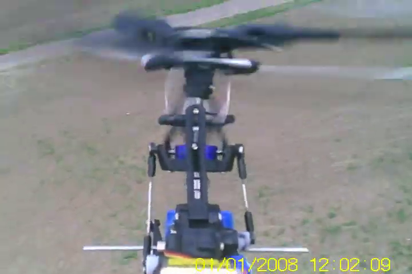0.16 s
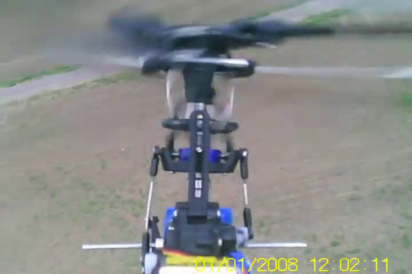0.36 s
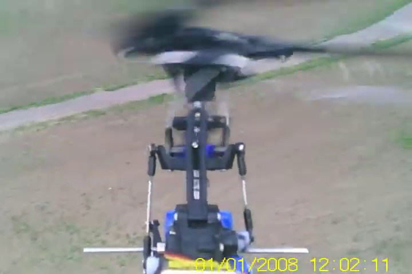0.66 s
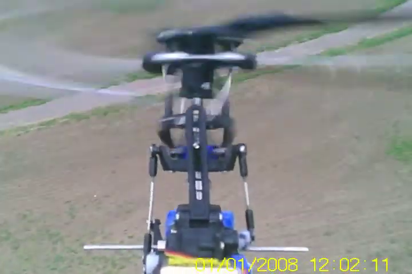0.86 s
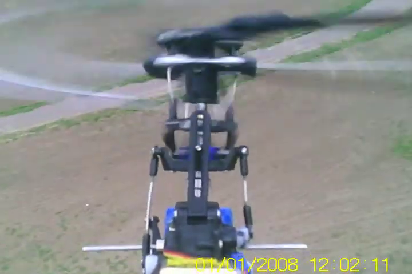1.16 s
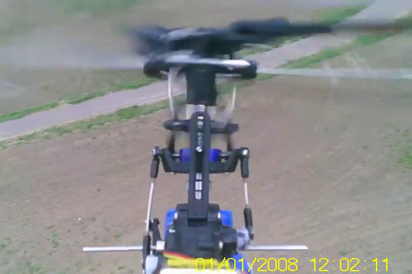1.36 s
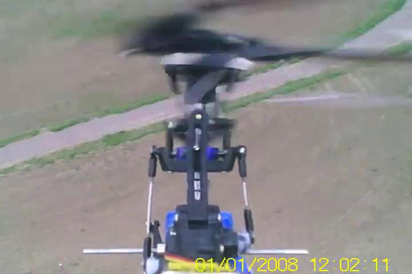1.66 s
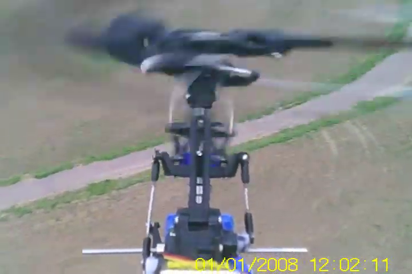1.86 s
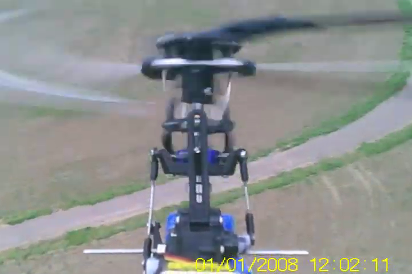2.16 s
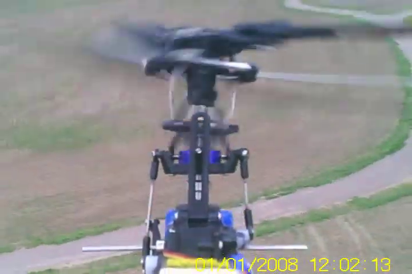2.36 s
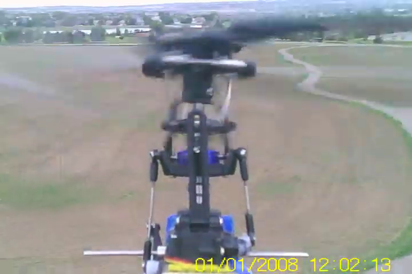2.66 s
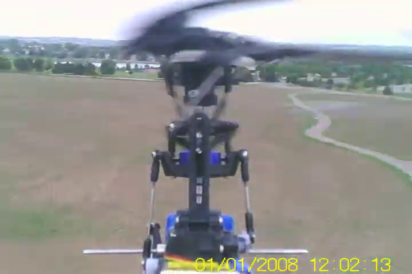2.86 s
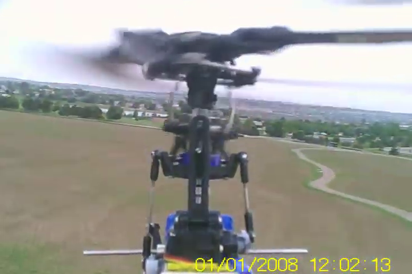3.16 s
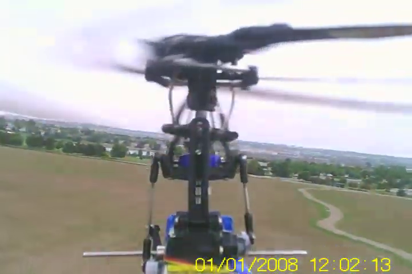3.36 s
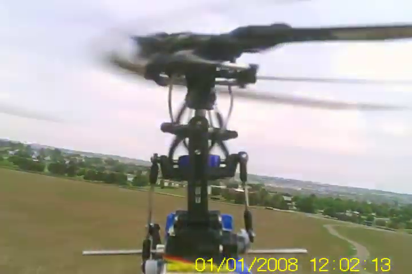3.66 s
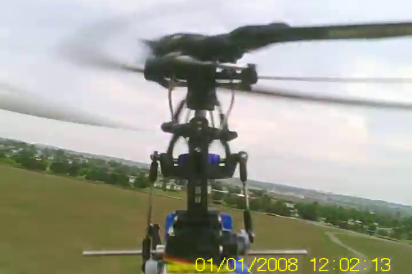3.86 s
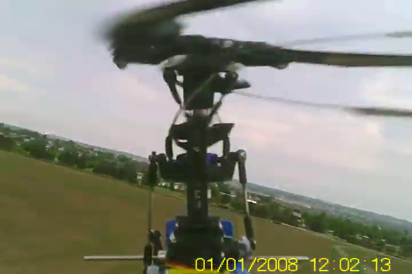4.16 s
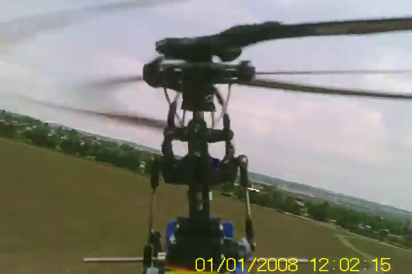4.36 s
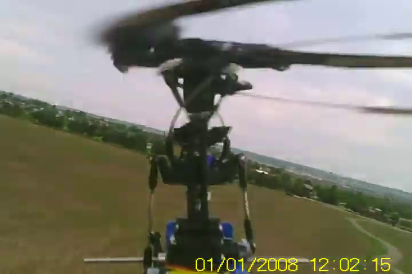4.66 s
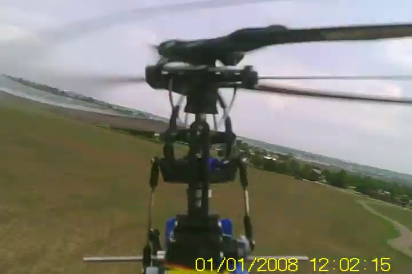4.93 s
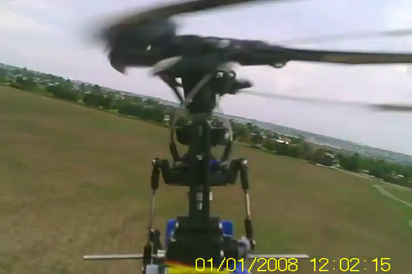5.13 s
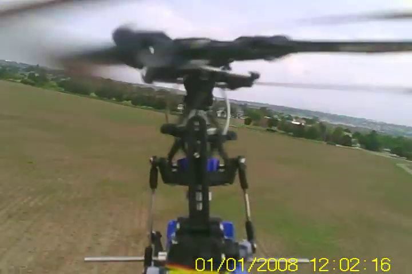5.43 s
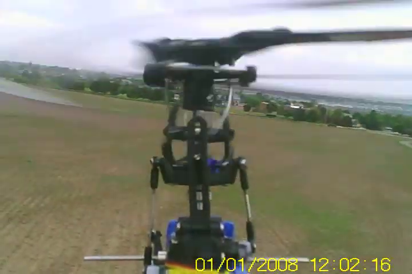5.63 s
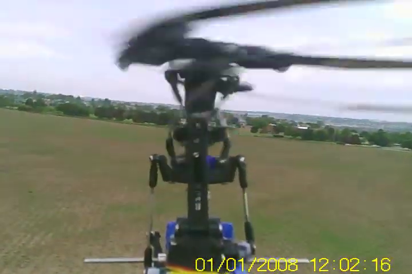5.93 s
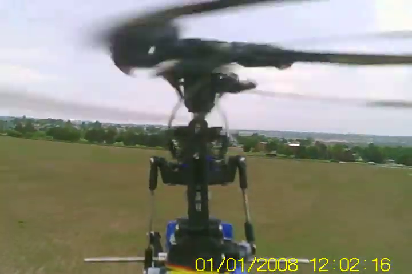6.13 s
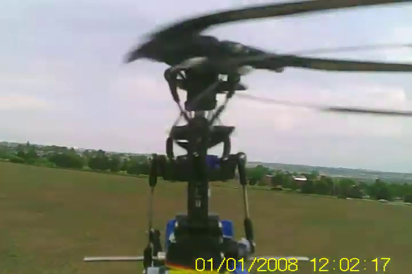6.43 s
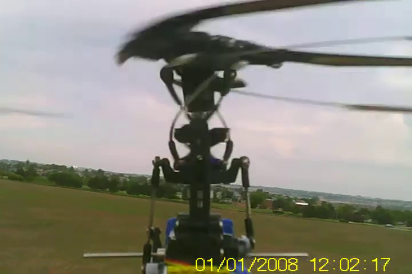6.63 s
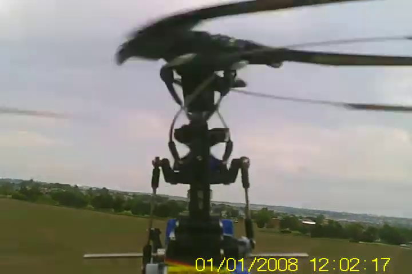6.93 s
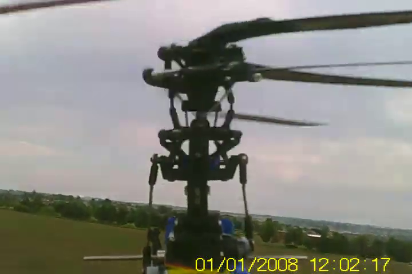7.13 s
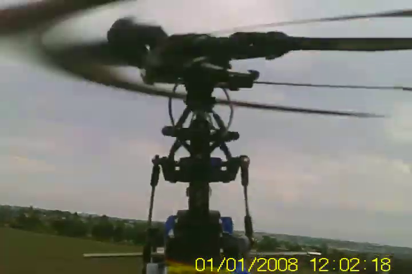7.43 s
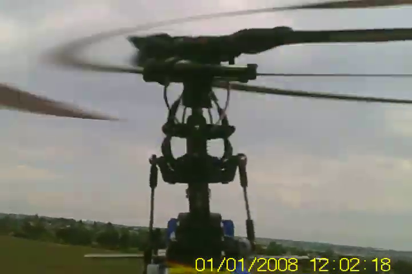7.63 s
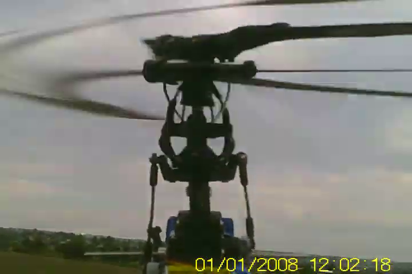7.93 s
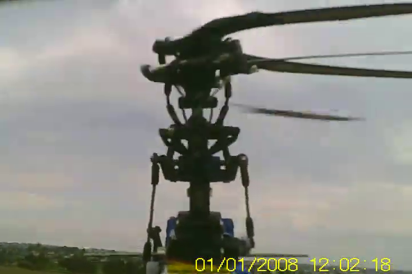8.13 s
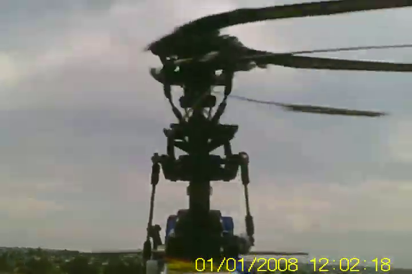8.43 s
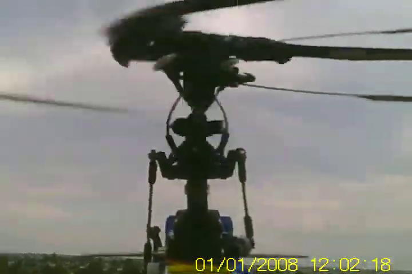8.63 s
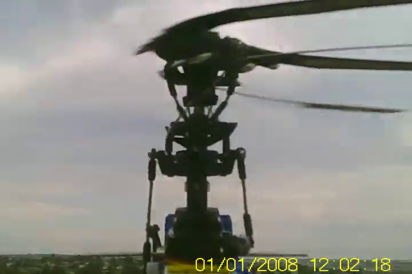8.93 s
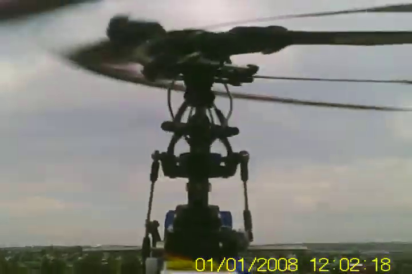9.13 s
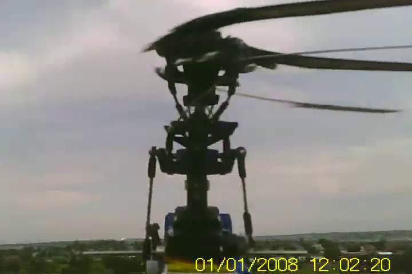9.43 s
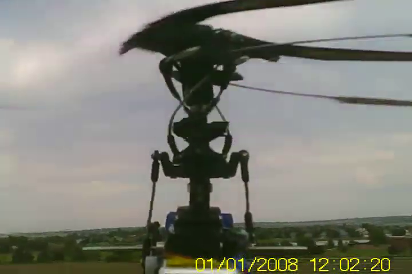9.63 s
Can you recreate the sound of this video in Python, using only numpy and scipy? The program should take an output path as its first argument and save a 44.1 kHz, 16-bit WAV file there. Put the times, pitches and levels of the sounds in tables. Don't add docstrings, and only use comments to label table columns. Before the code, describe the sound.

Close electric model helicopter: rapid blade slap at a buzzing rate sags in pitch, thumps harder, then climbs back, with gear whine, rattle and wind buffeting.

```python
import sys
import numpy as np
from scipy import signal
from scipy.fft import rfft, irfft, next_fast_len
from scipy.io import wavfile
from scipy.ndimage import uniform_filter1d, map_coordinates

SR = 44100
rng = np.random.default_rng(int(sys.argv[2]) if len(sys.argv) > 2 else 0)


def gain_from_db(level_db):
    decades = np.asarray(level_db, float) / 20
    return 10 ** decades


def dump_mix(stems):
    frames = np.atleast_2d(stems).T
    limited = np.clip(frames, -1, 1)
    pcm = np.round(limited * 32767).astype(np.int16)
    wavfile.write(sys.argv[1], SR, pcm)


N = 431738

# (time [s], blade-pass rate [Hz])
SPEED = [(0.0, 75.984), (0.6, 73.612), (1.3, 68.782), (1.8, 65.689), (2.23, 64.165), (2.7, 62.499),
         (2.96, 61.339), (3.41, 59.895), (3.7, 60.167), (4.18, 62.877), (4.59, 65.163), (5.21, 69.591),
         (5.63, 71.493), (6.09, 72.71), (6.88, 73.466), (8.4, 73.696), (9.37, 75.484), (9.79, 75.893)]
# (time [s], slap level [dB], sharpness [dB per overtone], forward lean [rad])
THRUST = [(0, -25, 0, 0.35), (.45, -25, 1, 0.35), (.9, -22, .5, 0.19), (1.4, -20, 0.5, 0.37),
          (1.95, -17, -0.5, 0.25), (2.55, -17.5, 1, 0.32), (3.2, -17, 0, 0.62), (3.9, -17, -1, 0.51),
          (4.5, -17.5, 0, 0.56), (5.1, -15, 1, 0.5), (5.6, -16, 2, 0.66), (6.1, -15.5, 1.5, 0.77),
          (6.65, -14, -0.5, 0.9), (7.2, -15.5, -.5, 0.64), (7.9, -15, -.5, 0.16), (8.3, -17.5, 0, .03),
          (9.3, -17, .5, 0.19), (9.79, -18.5, 0, 0.055)]
# (time [s], change [dB], length [s])
SWINGS = [(.4, 1.5, .3), (1.42, -12, .3), (2.9, 6, .4), (3.7, -8, .25), (4.15, 10, 0.45), (4.75, 7, .3),
          (5.15, 7, .25), (5.55, 5, .2), (6.7, 13, 0.42), (8.2, 8, .3), (8.63, 9, .25), (9.3, 7, .2),
          (9.75, 7, 0.43)]
TRAIL = {.5: .8, 1.5: -1.6, 3.5: -1.6, 2.5: 2.5, 7.5: 3.8}


def unit(x):
    return x / np.sqrt(np.mean(x ** 2) + 1e-20)


def curves(rows):
    s, *columns = np.transpose(rows)
    t = np.arange(N) / SR
    return [np.interp(t, s, column) for column in columns]


def wobble(rate):
    coarse = np.arange(0, N + 16, 16)
    knots = rng.standard_normal(int(N * rate / SR) + 4)
    return np.interp(np.arange(N), coarse, map_coordinates(knots, [coarse * rate / SR]))


def swells(rows):
    t = np.arange(0, N, 64) / SR
    total_db = sum(db * np.exp(-(2 * (t - s) / length) ** 2) for s, db, length in rows)
    return np.interp(np.arange(N) / SR, t, total_db)


def filtered(x, response):
    m = next_fast_len(N + SR // 2)
    return irfft(rfft(x, m) * response(np.fft.rfftfreq(m, 1 / SR)), m)[..., :N]


def colour(points):
    f, db = np.transpose(points)
    return lambda hz: gain_from_db(np.interp(np.log(hz + 1), np.log(f + 1), db, left=-120, right=-120))


def resonant(modes):
    def response(f):
        total = 0
        for k, (centre, width, db) in enumerate(modes):
            total = total + (-1) ** k * gain_from_db(db) * 1j * f * width / (centre * centre - f * f + 1j * f * width)
        return total
    return response


def tone(angle, db, flutter_db, slip):
    strength = np.sqrt(2) * gain_from_db(db + np.clip(flutter_db, 0, 2) * wobble(12))
    return strength * np.cos(angle + slip * wobble(25))


def wake():
    # (blade-pass rate [Hz], crack [dB])
    crack_by_speed = [(62, 9.5), (64.5, 5.5), (67, 2.5), (72, .5), (73.5, 0)]
    return np.interp(curves(SPEED)[0], *np.transpose(crack_by_speed))


def crack(angle):
    skew, crack_db = curves(THRUST)[2], wake()
    pulse = np.exp(6 * (np.cos(angle - skew) - 1)) - .3
    return crack_db * (1.05 + .2 * wobble(60)) * pulse


def loading():
    # (time [s], change [dB], length [s])
    pockets = [(.15, 2, .1), (.6, 3, 0.11), (1.05, 1.5, .12), (1.6, 1, 0.072), (2.25, -2, .12),
               (4.05, -2.5, 0.15), (5.8, -4.5, .2), (6.0, 0.5, .1), (6.15, -0.5, 0.12), (4.2, 1, 0.09),
               (7.03, -2.5, .2), (8.1, -2, .15)]
    slap_db, sharp_db, lean = curves(THRUST)
    pocket_db = swells(pockets)
    overtone_db = slap_db + 0.59 * pocket_db
    second_db = overtone_db - 6 + sharp_db
    third_db = overtone_db - 12 + 2 * sharp_db
    tail_db = third_db - 7 - 0.57 * wake() + 1.73 * lean + 0.7 * wobble(2.544)
    return slap_db + pocket_db, second_db, third_db, tail_db


def blades(angle):
    # (order [multiples of blade pass], level re third overtone [dB])
    slap_upper = [(4, -6.5), (6, -17), (8, -26.5), (9, -27.5), (12, -35)]
    # (order [multiples of blade pass], level re imbalance [dB])
    uneven = [(.5, -1), (1.5, -9), (3.5, -17)]
    slap_db, second_db, third_db, tail_db = loading()
    turn_db = -37.5 + swells(SWINGS)
    skew = curves(THRUST)[2]
    orders = [
        (1, slap_db + 0.37 * wobble(7)),
        (2, second_db + 0.28 * wobble(7)),
        (3, third_db + 0.27 * wobble(7)),
        (5, tail_db),
    ]
    orders += [(k, third_db + db) for k, db in slap_upper]
    ragged = 1 + .07 * wake()
    slap = sum(tone(k * (angle - skew) + skew, db, flutter_db=.5, slip=0.028 * k * ragged)
               for k, db in orders)
    imbalance = sum(tone(k * angle + TRAIL[k], turn_db + db, flutter_db=5.0, slip=0.42)
                    for k, db in uneven)
    return slap + imbalance


def carried(line):
    order, db_per_rate, path = line
    speed, = curves(SPEED)
    torque = uniform_filter1d(np.gradient(speed) * SR, int(.4 * SR))
    return np.interp(order * speed, *np.transpose(path)) + db_per_rate * torque


def drive(angle):
    pole = 21, .1, [(1260, -59), (1320, -56), (1390, -61), (1460, -70), (1515, -53), (1545, -48.5),
            (1600, -49.5)]
    side_band = 63, -.2, [(3780, -58), (3970, -60.5), (4060, -61), (4200, -66), (4400, -71), (4530, -67),
                 (4630, -62.5), (4790, -65.5)]
    gear_mesh = 70, 1.1, [(4200, -59), (4400, -63), (4600, -57.5), (4760, -62), (4900, -76), (5080, -56),
                 (5180, -52), (5320, -56.5)]
    mesh_over = 140, 1.2, [(8400, -72), (8800, -68), (9000, -63), (9250, -63), (9900, -70), (10300, -66),
                 (10640, -70)]
    tail_over = 10, .6, [(600, -56), (630, -55), (650, -50), (700, -49.5), (722, -51), (736, -48.5),
                 (760, -47)]
    tail_gear = 30, .5, [(1800, -48), (1900, -50), (2050, -58.5), (2170, -52), (2280, -52.5)]
    tail_belt = 45, .3, [(2700, -62), (2880, -60.5), (3020, -55), (3130, -57), (3230, -50.5), (3330, -48.5),
                 (3420, -49.5)]
    # (order [multiples of blade pass], level [dB])
    weak_lines = [(15, -55), (27.5, -54), (28, -54), (46.75, -53.5), (56, -54), (77, -61)]
    # (frequency [Hz], width [Hz], level [dB])
    boom = [(1000, 300, 0), (1740, 280, 0), (3070, 300, 0), (3640, 200, 0), (4640, 180, 0), (5250, 400, -1)]

    motor = tone(7 * angle + 3.4, -38.8, flutter_db=.8, slip=.1)
    motor += tone(21 * angle, carried(pole) + 1, flutter_db=1.2, slip=.2)
    motor += tone(63 * angle, carried(side_band) + 1, flutter_db=1, slip=.3)

    shaft_db = -39 + 0.35 * swells(SWINGS)
    lines = [(2.5, shaft_db), (7.5, shaft_db - 8.5), (10, carried(tail_over)),
             (30, carried(tail_gear)), (45, carried(tail_belt))]
    tail = sum(tone(k * angle + TRAIL.get(k, 0), db, flutter_db=1.0, slip=0.14) for k, db in lines)

    depth = np.interp(curves(SPEED)[0], [66, 72], [.25, .9])
    runout = (1 + depth * np.cos(angle / 2 + 0.8)) / np.sqrt(1 + depth ** 2 / 2)
    mesh = tone(70 * angle, carried(gear_mesh) + .5, flutter_db=1, slip=.4)
    mesh += tone(140 * angle, carried(mesh_over), flutter_db=1, slip=.8)

    weak = sum(tone(k * angle, db, flutter_db=1.5, slip=0.15) for k, db in weak_lines)
    return motor + tail + runout * mesh + filtered(weak, lambda hz: resonant(boom)(hz) ** 2)


def rattle(angle):
    # (frequency [Hz], width [Hz], level [dB])
    frame_modes = [(1738, 270, 0.5), (3035, 380, 3), (3367, 420, 3.5), (3742, 260, -0.5), (4710, 780, -12)]
    link_modes = [(5210, 510, -5.5), (5860, 500, -7), (6860, 610, -4), (7750, 413, 0.5), (9460, 1060, -5.5),
                  (10950, 1380, -11.5)]
    # (time [s], change [dB], length [s])
    shakes = [(.9, 2.5, 1), (1.24, 3, .06), (1.285, 5, .012), (3.1, -3, 1), (5.89, 1.5, .1), (6.15, 4, .08),
              (6.35, 5, .06), (6.49, 2.5, .06), (6.65, 3, .08), (8.94, -2, .05), (9.55, 1.5, 0.43)]
    over_speed = curves(SPEED)[0] - 73.5
    over_slap = curves(THRUST)[0] + 16
    loose_db = 0.19 * over_speed + 0.34 * over_slap
    frame_db = -45.5 + 0.22 * over_slap + 0.033 * loose_db
    links_db = -44 + loose_db + swells(shakes)

    cycle = np.cos(angle - 2.1) + .6 * np.cos(2 * angle - 3.6) + .7 * np.cos(angle / 2 + .5)
    shaft = np.cos(2.5 * angle + 1.1)
    chatter = 2.63 * wobble(600) + 0.61 * wobble(110) + 0.082 * wobble(16)
    ticks = (rng.random(N) < 90 / SR) * rng.standard_normal(N) * 6
    contacts = gain_from_db(2.4 * cycle + 2.1 * shaft + chatter) * (rng.standard_normal(N) + ticks)
    links = unit(filtered(contacts, resonant(link_modes)))
    throb = gain_from_db(1.35 * shaft + 0.45 * chatter + .5 * crack(angle)) * rng.standard_normal(N)
    frame = unit(filtered(throb, resonant(frame_modes)))
    return gain_from_db(links_db - 0.44) * links + gain_from_db(frame_db + 2.0) * frame


def wash(angle):
    # (time [s], level [dB])
    turbulence = [(0, -52.5), (.5, -50.5), (1.23, -42.5), (1.45, -43.5), (2.1, -42), (2.56, -39),
                  (3.0, -40.5), (3.4, -41), (3.85, -39.5), (4.2, -43), (4.55, -44), (5.4, -41), (5.7, -38),
                  (6.05, -38), (6.8, -42), (7.55, -42.5), (8.5, -44), (9.79, -46.5)]
    # (time [s], change [dB], length [s])
    gusts = [(0, 9, 0.068), (1.23, 8, 0.22), (2.1, 8, 0.25), (2.56, 4, 0.091), (2.78, 7, 0.13),
             (3.05, 4, 0.42), (3.3, 9, .12), (3.49, 6, 0.12), (3.82, 4, 0.17), (4.1, 5, .12), (4.62, 0, .1),
             (5.05, 4, .15), (5.48, 4, .1), (6.02, 2, .25), (6.66, 10, .15), (7.58, 6, .1),
             (8.28, 4.5, 0.18), (8.65, 3, .3)]
    # (frequency [Hz], density [dB per Hz])
    buffet_colour = [(2, -16), (10, -1.5), (25, 1), (45, -4.5), (100, -6.5), (200, -16), (400, -31.5),
                     (700, -51)]
    rush_colour = [(150, 8), (300, 5), (600, -0.5), (1000, -1.5), (1500, -7), (1850, -12.5), (2400, -14.5),
                   (4000, -19), (9000, -68)]
    # (frequency [Hz], level [dB])
    snap_colour = [(250, -40), (600, 0), (1500, 0), (3500, -14), (8000, -50)]
    skew, crack_db = curves(THRUST)[2], wake()
    rush_db, = curves(turbulence)
    gust_db = swells(gusts)
    buffet_db = -36 + 0.96 * (rush_db - rush_db.mean()) + 0.27 * crack_db + gust_db
    rush_db = rush_db + 0.075 * gust_db

    gust = wobble(9)
    buffet = gain_from_db(1.2 * gust) * filtered(rng.standard_normal(N), colour(buffet_colour))
    calm = 1 - .6 * np.exp(3 * (np.cos(angle - skew) - 1))
    lumps = gain_from_db(.6 * crack(angle) + .5 * gust + 1.4 * wobble(90))
    rush = filtered(lumps * rng.standard_normal(N), colour(rush_colour))
    push = np.exp(400 * (np.cos(angle - skew + .12 * wobble(40)) - 1))
    spike = gain_from_db(3.2 * wobble(50)) * push
    snap = crack_db / 9 * unit(filtered(spike, colour(snap_colour)))
    return gain_from_db(buffet_db + 3) * calm * unit(buffet) + gain_from_db(rush_db + 6.5) * unit(rush) + gain_from_db(rush_db - 3) * snap


def scene():
    angle = 2 * np.pi * np.cumsum(curves(SPEED)[0]) / SR - .62
    return (blades(angle) + drive(angle - .2) + rattle(angle - .2) + wash(angle))[None]


def top_cut(x):
    return signal.sosfilt(signal.butter(12, 12390, fs=SR, output="sos"), x)


def record(dry):
    # (frequency [Hz], level [dB])
    mic_response = [(1, -6), (6, -0.5), (10500, 0.5), (11500, -1.5), (12000, -7), (12500, -45),
                    (13500, -70)]
    squashed = dry / (1 + np.abs(dry / .72) ** 4) ** (1 / 4)
    mix = filtered(squashed, colour(mic_response)) - .0076
    return top_cut(mix)


dry = scene()
out = record(dry)
dump_mix(out)
```